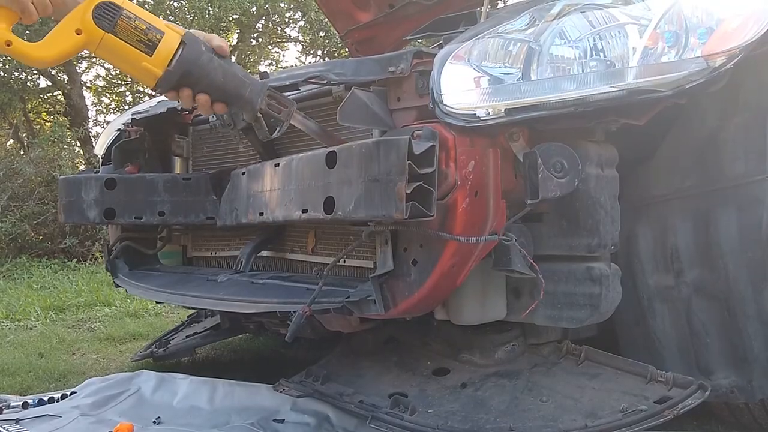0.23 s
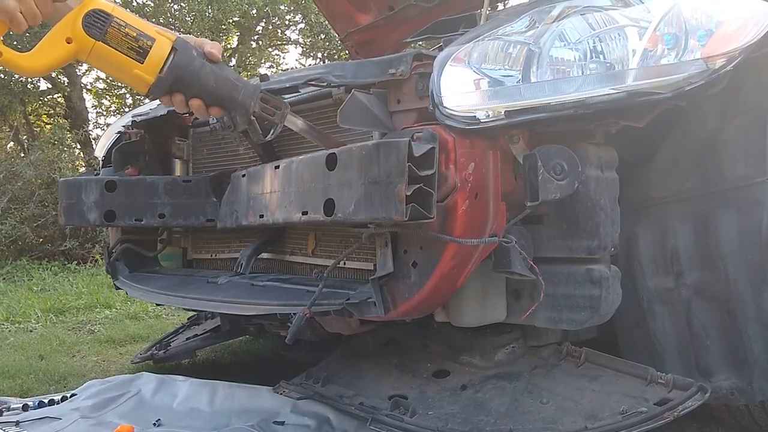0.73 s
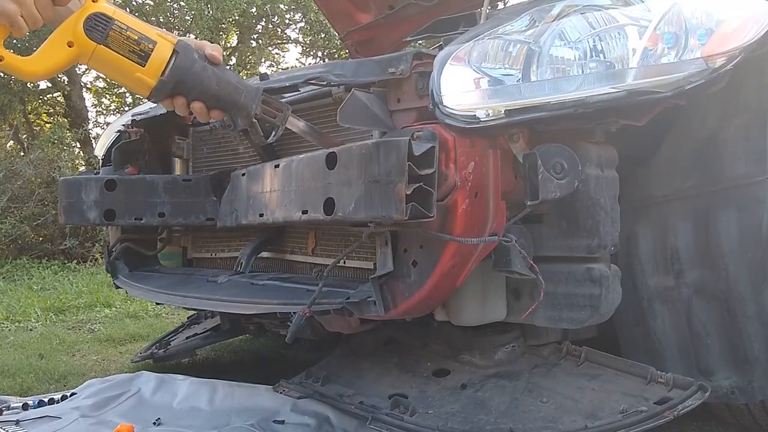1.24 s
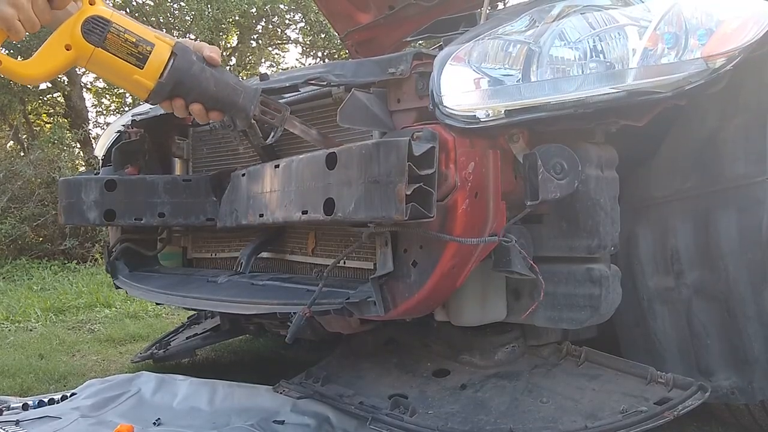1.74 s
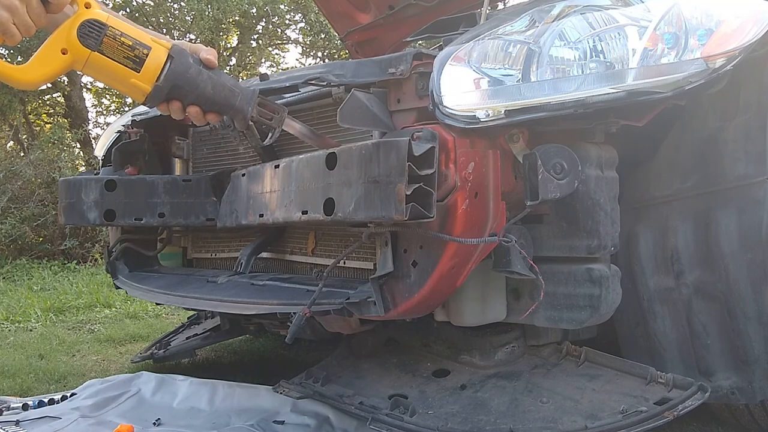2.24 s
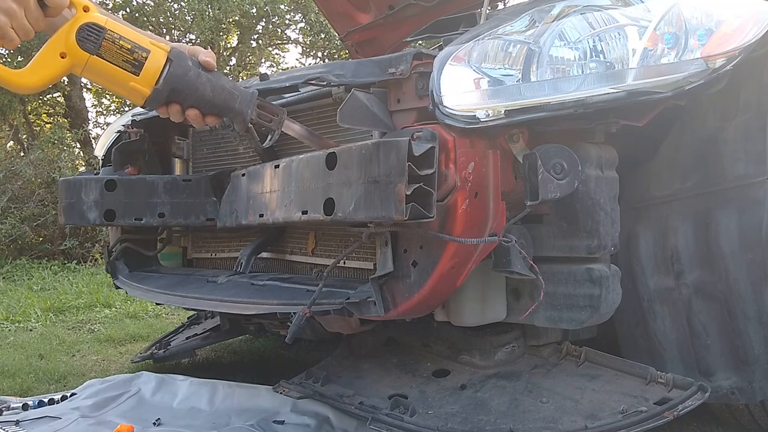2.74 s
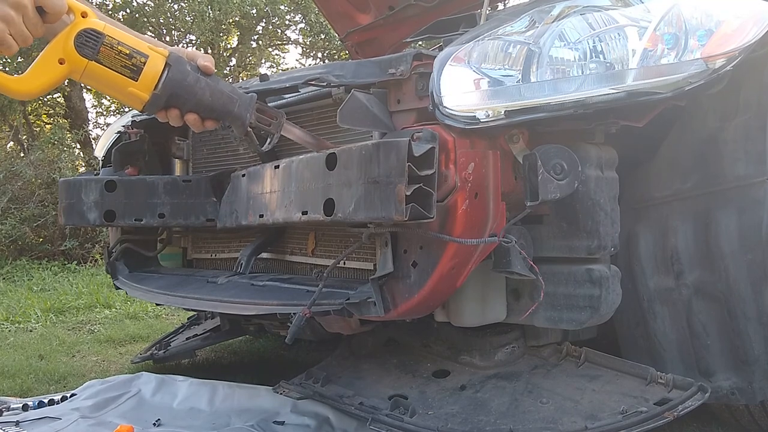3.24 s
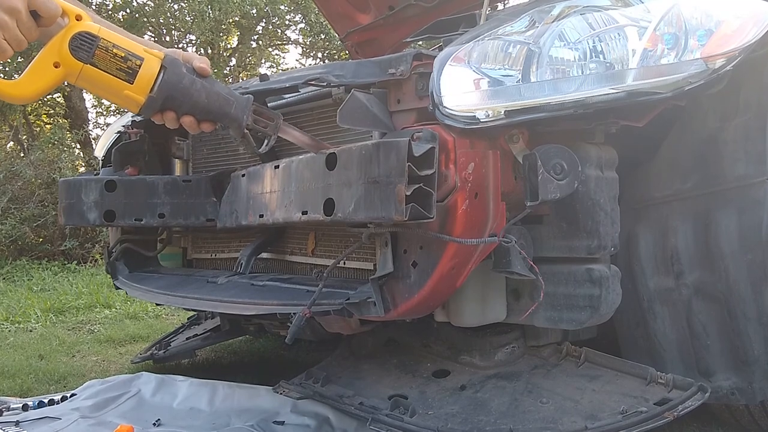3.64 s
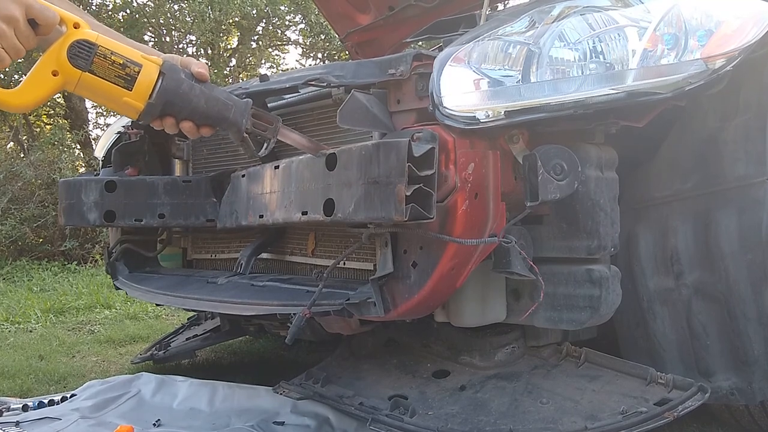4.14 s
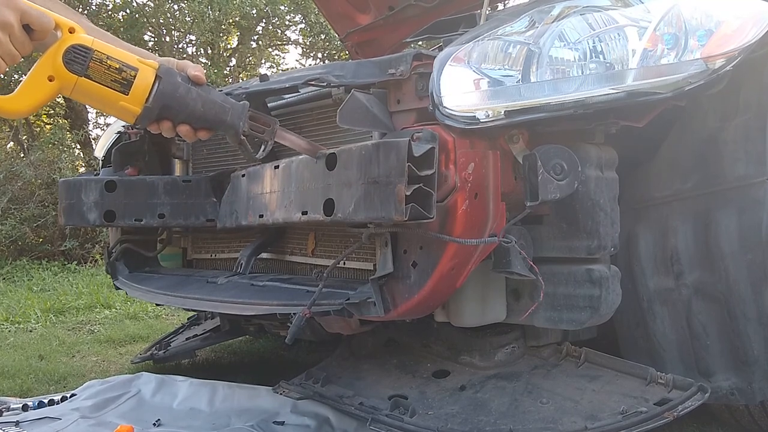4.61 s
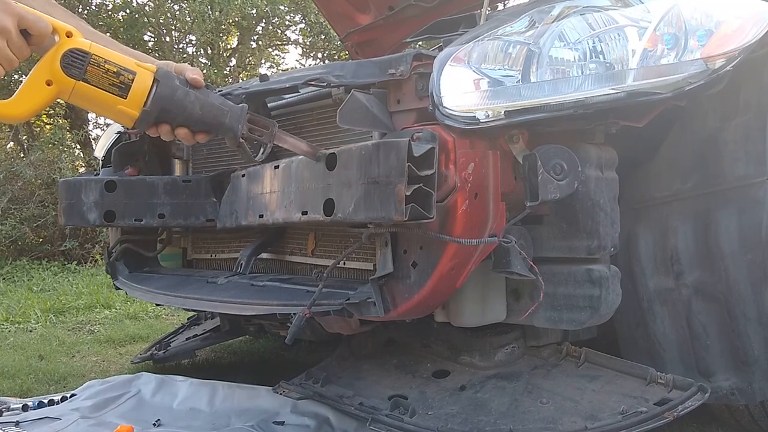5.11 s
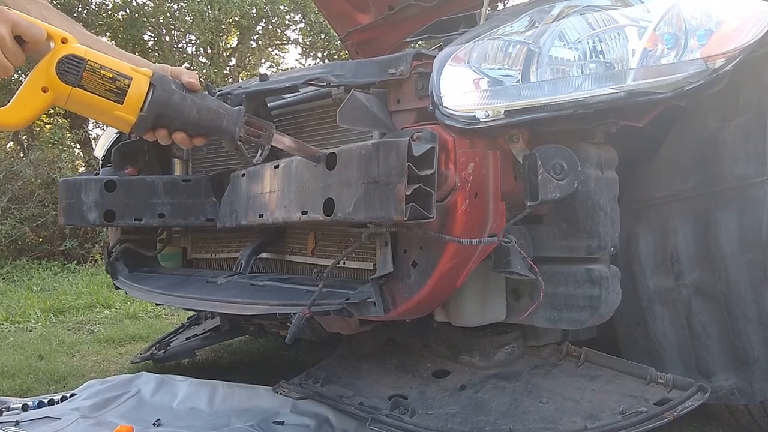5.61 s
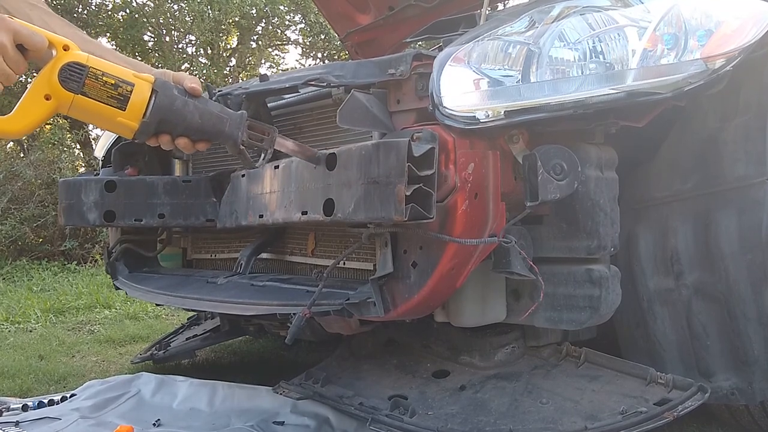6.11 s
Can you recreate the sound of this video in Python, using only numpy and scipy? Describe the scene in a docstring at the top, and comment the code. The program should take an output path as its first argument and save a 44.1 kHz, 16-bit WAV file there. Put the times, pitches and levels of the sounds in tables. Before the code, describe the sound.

A reciprocating saw rasps steadily through a car's steel bumper beam outdoors, a fast bright buzz with metallic ringing, hiss and brief early clatter.

```python
"""A rasp of some 125 bites/s: a reciprocating saw cuts a car's steel bumper beam, outdoors. Teeth scrape
twice a stroke as pulsed noise, coloured by beam resonances that change as the cut deepens. The blade
chatters, slaps and squeals: slaps are decaying modes, squeals are sines restarted at each bite. Faint
motor whine and gear whirr are tones and noise; a draught flutters and pops on two close microphone ports."""
import sys
import numpy as np
from scipy import signal
from scipy.fft import rfft, irfft, next_fast_len
from scipy.io import wavfile
from scipy.ndimage import uniform_filter1d, map_coordinates

SR = 44100
rng = np.random.default_rng(int(sys.argv[2]) if len(sys.argv) > 2 else 0)


def log_audio(samples):
    """Write samples as a 16-bit WAV file to the path given in sys.argv[1]."""
    # one column per channel
    frames = np.atleast_2d(samples).T
    # limit to full scale, then quantise
    limited = np.clip(frames, -1, 1)
    pcm = np.round(limited * 32767).astype(np.int16)
    wavfile.write(sys.argv[1], SR, pcm)


N = 280514
TIME_S = np.arange(N) / SR

# Table levels precede the offsets passed in scene() and the stereo widening in record().
# saw speed, two bites a stroke: t/s, bite rate/Hz
BITE_RATE = [(0, 122), (.4, 121.5), (.52, 125), (.7, 128.3), (1, 127.7), (2.3, 123.8), (2.7, 125.3),
             (4.3, 126.6), (4.8, 126.9), (5, 127.5), (5.8, 127.3), (6.2, 127.6)]
# cut depth, 0 top wall, 1 corner, 2 front wall: t/s, depth/walls
CUT_DEPTH = [(0, 0.022), (2.7, 0.23), (3.3, 0.9), (4.3, 1.25), (5, 1.9)]
# modes of beam and blade: f/Hz, width/Hz, level over scrape/dB at top wall, at corner, at front wall
STEEL_MODES = [(2515, 44, 6, 2, 7), (2705, 45, -0.5, -9, 8), (3437, 97, 12.5, 0, 9),
               (3606, 54, 19.5, 14, 15.5), (3755, 58, 17, -5, 9), (4110, 61, 17, 4, 14),
               (4200, 48, 19, 9, 14), (4333, 45, 16, 18, 19), (4403, 39, 23, 5, 14),
               (4720, 80, 9, 16, 18.5), (4830, 60, 23, 10, 23), (4950, 57, 15.5, 18.5, 22),
               (5160, 61, 16, 11, 13), (5110, 52, 10.5, 16, 18), (5300, 110, -4, 13, 17),
               (5400, 51, 17, 10.5, 14), (5575, 46, 18, 8, 13), (5800, 180, 9, 4.5, -10),
               (6370, 42, 9.5, 3, 1), (6910, 25, 6, 2, -3), (8570, 150, 1, 2.5, -7), (9440, 140, 9, 1, -17),
               (9670, 58, -3, 13, 12), (10130, 86, 17.5, 0, 12.5), (10465, 91, 9.5, 16.5, 17),
               (11050, 97, 1, 14, -3), (11180, 130, 12.5, 2, 3.5), (11700, 76, 1, 7, 6.5),
               (11900, 140, 12.5, 6, 2), (12100, 120, 2, -2, 3), (12480, 180, 13.5, 9.5, -12),
               (13160, 84, -9, 15.5, -1), (13941, 140, 8, 5, 2)]
# scrape spectrum: f/Hz, density/dB
SCRAPE_SPECTRUM = [(40, -60), (130, -24), (400, -10.5), (900, -9.5), (1500, -11), (2200, -6), (3000, -1.5),
                   (4600, -8.5), (6000, 3), (7200, 12.5), (8500, 8), (10000, -3.5), (12000, -2),
                   (14000, 0.5), (15500, -4.5)]
# scrape, port difference relative to common sound: f/Hz, level/dB
PORT_DIFFERENCE = [(200, -24), (1000, 2.5), (2000, 2), (2900, -29), (3700, -27), (4300, 4.5), (4950, -5.5),
                   (6000, -4.5), (7000, -5), (7700, -12), (9000, -0.5), (11200, -2.5), (12000, 0),
                   (14500, 0.5)]
# lean on the blade: t/s, beam ring level/dB, tooth hiss level/dB
BLADE_LEAN = [(0, -38, -40), (.55, -39, -42), (1, -39.5, -40.5), (1.9, -39.5, -42), (2.2, -40.5, -41.5),
              (3.3, -42.5, -43.5), (4.4, -42.5, -42), (5.3, -42.5, -40), (6.1, -41, -41)]
# teeth catch (+) or skid (-): middle t/s, length/s, force change/dB
TOOTH_SNAGS = [(0.13, 0.012, -3), (0.39, 0.015, 1), (0.437, .04, 1), (0.645, 0.046, 1), (0.82, .06, 1),
               (1.487, .09, 2.5), (1.568, 0.093, -2.5), (1.623, 0.042, 2), (1.856, .04, 3),
               (2.206, 0.24, -2), (2.307, 0.053, 1.4), (2.37, .06, -1.5), (4.793, .04, 0),
               (5.203, 0.091, -1.5), (5.339, 0.036, -4), (5.946, 0.045, 3), (6.078, .06, 2)]
# motor whine swells: start t/s, end t/s, level/dB
MOTOR_SWELLS = [(0.433, .52, -66), (.62, .8, -79), (0.82, 1.22, -70), (1.54, 2.414, -67.5),
                (2.54, 2.8, -66.5), (2.9, 3.1, -72), (3.25, 3.6, -73), (4.95, 6.36, -87)]
# gearbox whirr: t/s, level/dB
GEAR_WHIRR = [(0, -51), (.35, -63), (.7, -50), (1.4, -53), (2, -50), (2.7, -49.5), (3.3, -57.5),
              (4.3, -57.5), (5, -53), (6.36, -55.5)]
# gear housing spectrum: f/Hz, density/dB
HOUSING_SPECTRUM = [(50, -60), (150, -23), (400, -9.5), (900, -7), (1300, -11.5), (1650, -6.5), (2000, -9),
                    (2650, -4.5), (3200, -2), (4500, -8), (9000, -24)]
# draught spectrum: f/Hz, density/dB
DRAUGHT_SPECTRUM = [(25, -51), (80, -24), (150, -9), (200, -5), (255, 0), (300, -0.5), (550, -1.5),
                    (1000, -7), (2200, -12.5), (4000, -11.5), (9000, -24)]
# strongest eddies, popping on the left port: t/s, level/dB, width/ms
EDDY_POPS = [(3.022, -44, 0.46), (3.145, -54, 1), (3.326, -50, 0.49), (3.3324, -38.5, 0.6),
             (3.366, -51, 0.45), (3.413, -52, .6), (3.43, -46, 0.3), (3.544, -49, .4), (3.564, -45, 0.48),
             (3.667, -51, 0.72), (3.747, -50, .6), (3.882, -48, 0.45), (3.992, -49, .8), (4.222, -50, .5),
             (4.24, -48, .7), (4.261, -46, 0.59), (4.292, -49, 0.4), (4.307, -46, 0.72), (4.333, -46, 0.78),
             (4.351, -51, 0.57), (4.41, -44.5, 0.6), (4.42, -46, 0.46), (4.477, -52, 0.58),
             (4.6, -53, 0.53), (4.672, -49, .55), (4.947, -46, 0.38), (5.28, -47, 0.46), (5.383, -48, 0.61),
             (5.425, -46, 0.47)]
# blade squeals: start t/s, end t/s, f/Hz, level/dB, bite-to-bite phase scatter/rad
BLADE_SQUEALS = [(0.035, 0.16, 3640, -43, 0.73), (0.19, 0.34, 3700, -40.5, 1.5),
                 (0.2, 0.34, 5080, -41, 0.98), (1.12, 1.36, 3540, -46.5, 0.45),
                 (1.6, 1.78, 3300, -46.5, .35), (1.9, 2.75, 3650, -55.5, 0.58), (4.15, 4.55, 3650, -57, .2),
                 (4.52, 4.77, 3545, -50, .1), (4.77, 4.85, 3750, -51, .2), (2.9, 4.2, 5310, -54.5, .25),
                 (2.08, 2.8, 4260, -54, 0.3), (4.25, 4.75, 4305, -55.5, .1), (4.54, 4.8, 4945, -40.5, .12),
                 (4.88, 5.0, 4980, -42, .3), (5.52, 5.7, 4970, -44, 0.91), (5.9, 6.22, 4980, -48, 1.3),
                 (4.3, 4.45, 2130, -58, .2), (3.7, 4.8, 10480, -56, 1.5), (4.7, 6.4, 10460, -53.5, 1.2),
                 (5.86, 6.36, 10520, -45.5, 1.1)]
# blade slaps on the beam: t/s, level/dB
BLADE_SLAPS = [(.1415, -28), (.176, -31), (.2135, -28.5), (.2228, -28), (.231, -29.5), (.262, -31),
               (.293, -31), (.3123, -29), (.3243, -26), (.389, -27), (1.51, -28), (1.856, -30)]

# tooth pressure swing over a bite; eases as the kerf guides the blade
SWING_DB, EASE_DB_PER_WALL = 1.2, 0.5
# share of the swing that makes a bite start sharply and tail off
BITE_SKEW = 0.33
# chatter as the blade settles in: harder bites
CHATTER_START_S, CHATTER_END_S, CHATTER_RISE_S, CHATTER_FALL_S = 0.02, 0.24, 0.4, 0.092
CHATTER_FULL_DB = 0.7
# share by which chatter slows the bites, its timing, and a moment at which a bite peaks
CHATTER_DRAG, BITE_PEAK_S = 0.235, 0.3265
DRAG_START_S, DRAG_END_S, DRAG_RISE_S, DRAG_FALL_S = 0.15, 0.38, 0.13, 0.07
HISS_SPLIT_HZ = 7400

WHINE_REST_DB, WHINE_RISE_S, WHINE_FALL_S = -78.5, 0.099, 0.17

# one gust over a light draught
CALM_DB, GUST_DB = -69.5, -62
GUST_START_S, GUST_END_S, GUST_RISE_S, GUST_FALL_S = 2.55, 3.55, 0.44, 3.17
# air stirred by each tabled pop, relative to its table level
STIR_REL_DB, STIR_S = -26.5, 0.036
# random small pops; the rate is that at full gust
SMALL_POPS_PER_S, SMALL_POP_DB, SMALL_POP_MS = 4.5, -58, 0.51
# the ports pass little of a pop below this
PORT_CUT_HZ = 235

SQUEAL_RISE_S, SQUEAL_FALL_S = 0.11, 0.039
# slap: crack share and decay, decay of ring by damping, highest pitch that rings well
SLAP_CRACK, SLAP_CRACK_S, SLAP_DAMP_S, SLAP_TOP_HZ = 0.4, 0.002, 0.007, 6000

# stereo widening: share crossed between ports, pitch of one period's delay; band limit
CROSS_SHARE, CROSS_NOTCH_HZ, TOP_HZ = 0.85, 7600, 15700


def amp(db):
    """Decibels to gain."""
    return 10 ** (np.asarray(db) / 20)


def unit(x):
    """Scale to rms 1."""
    return x / np.sqrt(np.mean(x ** 2) + 1e-20)


def along(points, f_hz):
    """Interpolate (f/Hz, value) points on a log frequency axis."""
    f, v = np.transpose(points)
    return np.interp(np.log(f_hz + 1), np.log(f), v)


def curves(rows):
    """One value per sample for each column after the time."""
    t_s, *columns = np.transpose(rows)
    return [np.interp(TIME_S, t_s, column) for column in columns]


def wobble(rate_hz):
    """Smooth random curve, rate_hz knots a second."""
    knots = rng.standard_normal(int(N * rate_hz / SR) + 4)
    return map_coordinates(knots, [TIME_S * rate_hz])


def held(start_s, end_s, rise_s, fall_s):
    """Envelope within 0 to 1: rises from start, falls after end; a short one stays below 1."""
    rise = (TIME_S - start_s) / rise_s
    fall = 1 - (TIME_S - end_s) / fall_s
    return np.clip(np.minimum(rise, fall), 0, 1)


def bump(middle_s, length_s):
    """Smooth swell from 0 to 1 and back."""
    return np.cos(np.pi * np.clip((TIME_S - middle_s) / length_s, -0.5, 0.5)) ** 2


def filtered(x, response):
    """x times a response of frequency."""
    size = next_fast_len(N + 8192)
    return irfft(rfft(x, size) * response(np.fft.rfftfreq(size, 1 / SR)), size)[..., :N]


def ports(common, difference):
    """Pressure at the left and right port."""
    return np.array([common + difference, common - difference])


def bite_count(rate_hz):
    """Bites so far, whole at each peak; chatter drags them slower for a moment."""
    drag = CHATTER_DRAG * held(DRAG_START_S, DRAG_END_S, DRAG_RISE_S, DRAG_FALL_S)
    bites = np.cumsum(rate_hz * (1 - drag) * (1 + 0.002 * wobble(30))) / SR
    return bites + 1 - np.interp(BITE_PEAK_S, TIME_S, bites) % 1


def teeth(bites, repeat, grit_db):
    """Part of the contact noise repeats each bite, the rest is fresh; grit roughens it."""
    count = round(SR / 126)  # samples in a typical bite
    pattern = rng.standard_normal((2, count))
    position = [bites % 1 * count]
    again = unit(np.array([map_coordinates(row, position, mode="grid-wrap", order=5) for row in pattern]))
    fresh = rng.standard_normal((2, N))
    noise = np.sqrt(repeat) * again + np.sqrt(1 - repeat) * fresh
    return noise * amp(grit_db * wobble(1500))


def beam(f_hz, stage, ripple_db):
    """Scrape colour at one stage of cut: strong steel modes over a ripple of many weak ones."""
    peaks = 0
    for centre_hz, width_hz, *levels_db in STEEL_MODES:
        peaks = peaks + amp(levels_db[stage]) ** 2 / (1 + (2 * (f_hz - centre_hz) / width_hz) ** 2)
    weak = map_coordinates(rng.standard_normal(1000), [f_hz / 55], mode="mirror")
    return amp(along(SCRAPE_SPECTRUM, f_hz)) * np.sqrt(amp(ripple_db * weak) ** 2 + peaks)


def flare(x, flare_db):
    """As the contact shifts, neighbouring resonances flare and fade each on its own."""
    z = signal.stft(x, nperseg=512)[2]
    field = uniform_filter1d(rng.standard_normal(z.shape[1:]), size=4, axis=0)  # over frequency
    field = uniform_filter1d(field, size=9, axis=1)  # over time
    return signal.istft(z * amp(flare_db * unit(field)), nperseg=512)[1][:, :N]


def rasp(bites, ring_db, hiss_db, hiss_swing, uneven_db, lurch_db, sway_db, ripple_db):
    """Teeth scrape in one burst a bite; beam ring and hiss follow the force on the blade."""
    ring_level_db, hiss_level_db = curves(BLADE_LEAN)
    (depth,) = curves(CUT_DEPTH)
    snag_db = sum(db * bump(t_s, length_s) for t_s, length_s, db in TOOTH_SNAGS)
    chatter = held(CHATTER_START_S, CHATTER_END_S, CHATTER_RISE_S, CHATTER_FALL_S)
    swing_db = SWING_DB - EASE_DB_PER_WALL * depth + CHATTER_FULL_DB * chatter

    def colour(f_hz):
        apart = amp(along(PORT_DIFFERENCE, f_hz))
        return beam(f_hz, stage, ripple_db) * np.array([np.ones_like(f_hz), apart])

    scrape = 0  # rows: common, difference
    for stage in range(len(STEEL_MODES[0]) - 2):
        share = np.sqrt(np.clip(1 - np.abs(depth - stage), 0, 1))
        scrape = scrape + share * filtered(teeth(bites, repeat=0.19, grit_db=0.8), colour)
    scrape = flare(scrape, flare_db=1.7)
    low = filtered(scrape, lambda f_hz: 1 / (1 + (f_hz / HISS_SPLIT_HZ) ** 16))

    def steady(x):  # level out over 1/3 s: load sets loudness, whatever the colour
        return x / np.sqrt(uniform_filter1d(x[0] ** 2, size=SR // 3))

    def chance_db():  # no two bites alike
        return uneven_db * wobble(170) + lurch_db * wobble(35) + sway_db * wobble(12)

    pressure_db = swing_db * (np.cos(2 * np.pi * bites) - BITE_SKEW * np.sin(4 * np.pi * bites))
    ring_pulse = unit(amp(pressure_db + chance_db()))
    hiss_pulse = unit(amp(hiss_swing * pressure_db + chance_db()))
    ring = amp(ring_level_db + ring_db) * ring_pulse * steady(low)
    hiss = amp(hiss_level_db + hiss_db) * hiss_pulse * steady(scrape - low)
    return amp(snag_db) * ports(*(ring + hiss))


def motor(rate_hz, whine_db, overtone_db):
    """Armature whines at 7 times the undragged bite rate, with a weak gear tone at 13 times."""
    level = amp(WHINE_REST_DB)
    for start_s, end_s, db in MOTOR_SWELLS:
        level = level + amp(db) * held(start_s, end_s, WHINE_RISE_S, WHINE_FALL_S)
    turn_rad = 2 * np.pi * np.cumsum(rate_hz * (1 + 0.002 * wobble(25.18))) / SR
    shaft, gear = np.sin(7 * turn_rad), np.sin(13 * turn_rad)
    tone = level * amp(whine_db + 1.9 * wobble(16)) * unit(shaft + amp(overtone_db) * gear)
    return ports(tone, amp(-30) * tone)


def gearbox(bites, whirr_db, apart_db):
    """Crank and gears whirr evenly in their housing: partly repeating noise, housing-shaped."""
    (level_db,) = curves(GEAR_WHIRR)
    mesh = teeth(bites, repeat=0.38, grit_db=2.0)
    housed = unit(filtered(mesh, lambda f_hz: amp(along(HOUSING_SPECTRUM, f_hz))))
    common, difference = amp(level_db + whirr_db) * housed
    return ports(common, amp(apart_db) * difference)


def gust_envelope():
    """Share of the gust in the air flow."""
    return held(GUST_START_S, GUST_END_S, GUST_RISE_S, GUST_FALL_S)


def draught(flow_db, apart_db, lumpy_db, pop_db, right_db):
    """Moving air flutters on both ports as lumpy noise; eddies pop on the left as pressure swings."""
    gust = gust_envelope()
    flow = amp(CALM_DB + (GUST_DB - CALM_DB) * gust)
    flow = flow + sum(amp(db + STIR_REL_DB) * bump(t_s, STIR_S) for t_s, db, _ in EDDY_POPS)
    lumps = unit(amp(lumpy_db * wobble(260) + 1.25 * wobble(24.95)))
    eddies = lumps * rng.standard_normal((2, N))
    flutter = unit(filtered(eddies, lambda f_hz: amp(along(DRAUGHT_SPECTRUM, f_hz))))
    common, difference = flow * amp(flow_db) * flutter
    air = ports(common, amp(apart_db) * difference) * amp([[-right_db], [right_db]])

    small_times_s = TIME_S[rng.random(N) < gust * SMALL_POPS_PER_S / SR]
    small = [(t_s, SMALL_POP_DB, SMALL_POP_MS) for t_s in small_times_s]
    pops = np.zeros((2, N))
    for t_s, db, width_ms in list(EDDY_POPS) + small:
        u = (TIME_S - t_s) * 1000 / width_ms
        pops[0] -= amp(db + pop_db) * u * np.exp(-u * u)
    port_cut = signal.butter(3, PORT_CUT_HZ, "highpass", fs=SR, output="sos")
    return air + signal.sosfilt(port_cut, pops)


def rumble(level_db, swell_db, gust_db):
    """Faint low-passed noise comes and goes on both ports alike, stronger in the gust."""
    deep = unit(filtered(rng.standard_normal(N), lambda f_hz: 1 / (1 + (f_hz / 110) ** 2)))
    swell = np.tanh(2 * wobble(12) - 0.5)
    return amp(level_db + gust_db * gust_envelope() + swell_db * swell) * deep


def squeals(bites, swing_db, apart_db):
    """Blade sticks and slips in the kerf: each bite restarts nearly the same squeak."""
    bite = np.floor(bites + 0.5).astype(int)
    from_peak_s = (bites - bite) / (np.gradient(bites) * SR)
    sound = 0
    for start_s, end_s, pitch_hz, db, scatter_rad in BLADE_SQUEALS:
        phase, size = rng.standard_normal((bite.max() + 1, 2))[bite].T
        swell = np.cos(np.pi * bites) ** 2 * amp(swing_db * size)
        squeak = unit(swell * np.sin(2 * np.pi * pitch_hz * from_peak_s + scatter_rad * phase))
        sound = sound + amp(db) * held(start_s, end_s, SQUEAL_RISE_S, SQUEAL_FALL_S) * squeak
    return ports(sound, amp(apart_db) * sound)


def slaps():
    """Blade slaps the beam: a short crack, then top-wall modes ring until the blade damps them."""
    t_s = np.arange(SR // 20) / SR
    centre_hz, width_hz, level_db = np.transpose(STEEL_MODES)[:3, :, None]
    strength = amp(level_db + along(SCRAPE_SPECTRUM, centre_hz)) / (1 + (centre_hz / SLAP_TOP_HZ) ** 4)
    decay = np.exp(-np.pi * width_hz * t_s)
    sound = np.zeros(N + len(t_s))
    for start_s, db in BLADE_SLAPS:
        phase = 2 * np.pi * rng.random(centre_hz.shape)
        modes = strength * decay * np.sin(2 * np.pi * centre_hz * t_s + phase)
        ring = np.sum(modes, axis=0) / np.linalg.norm(strength) * np.exp(-t_s / SLAP_DAMP_S)
        crack = SLAP_CRACK * np.exp(-t_s / SLAP_CRACK_S) * rng.standard_normal(len(t_s))
        crack = np.diff(crack, prepend=0) / 2  # brighten
        sound[round(start_s * SR):][:len(t_s)] += amp(db) * (ring + crack)
    return ports(sound[:N], amp(-17) * sound[:N])


def scene():
    """Saw speed times the bites, which drive rasp, gears and squeals; air and rumble join."""
    (rate_hz,) = curves(BITE_RATE)
    bites = bite_count(rate_hz)
    saw = rasp(bites, ring_db=2.5, hiss_db=4.0, hiss_swing=0.46,
               uneven_db=0.56, lurch_db=0.49, sway_db=-0.06, ripple_db=3.0)
    saw = saw + motor(rate_hz, whine_db=10.5, overtone_db=-11.5)
    saw = saw + gearbox(bites, whirr_db=0.5, apart_db=-14.0)
    air = draught(flow_db=15.5, apart_db=-7.5, lumpy_db=2.5, pop_db=26.0, right_db=2.5)
    deep = rumble(level_db=-81, swell_db=17.5, gust_db=8.5)
    saw = saw + squeals(bites, swing_db=2.0, apart_db=-10) + slaps()
    return (saw + air) * amp([[-1], [1]]) + deep  # left 1 dB down, right 1 dB up


def record(dry):
    """Widen the stereo: take a delayed share of each port from the other, then limit the band."""
    crossed = filtered(dry[::-1], lambda f_hz: CROSS_SHARE * np.exp(-2j * np.pi * f_hz / CROSS_NOTCH_HZ))
    return filtered((dry - crossed) / (1 + CROSS_SHARE), lambda f_hz: f_hz < TOP_HZ)


dry = scene()
out = record(dry)
log_audio(out)
```